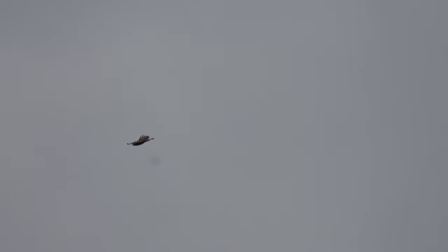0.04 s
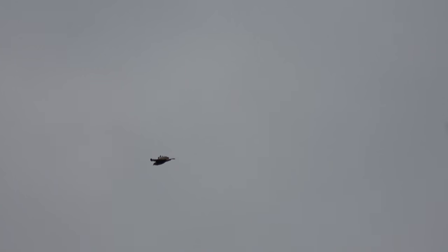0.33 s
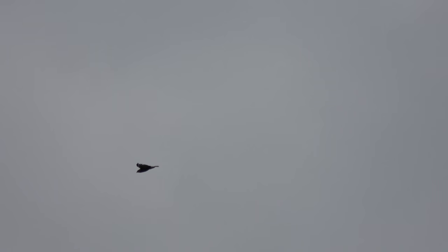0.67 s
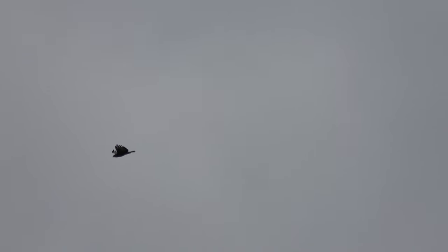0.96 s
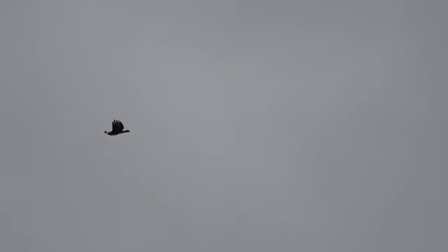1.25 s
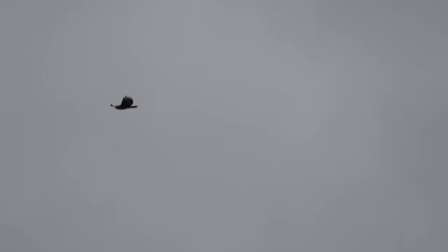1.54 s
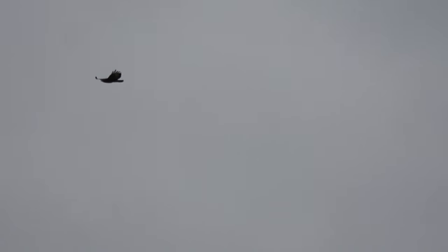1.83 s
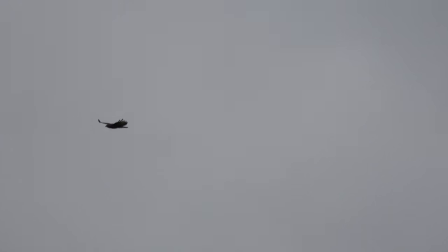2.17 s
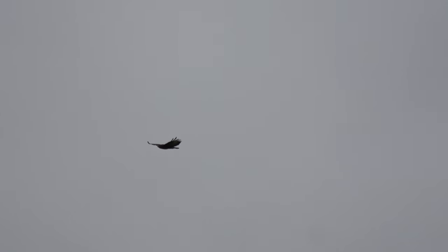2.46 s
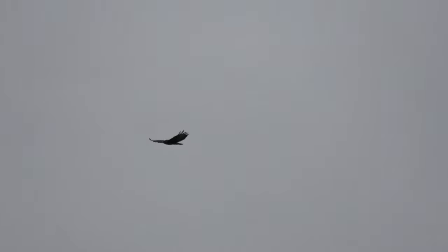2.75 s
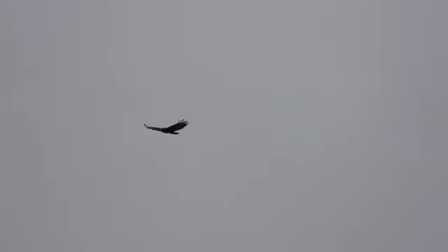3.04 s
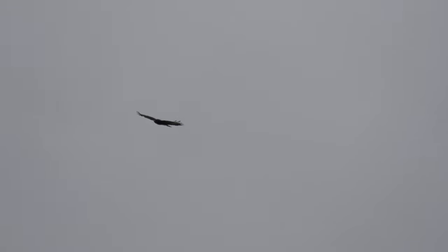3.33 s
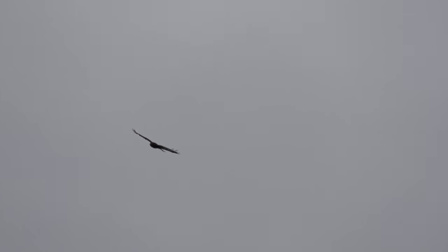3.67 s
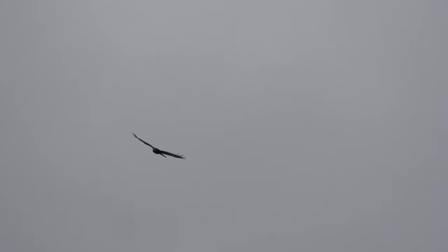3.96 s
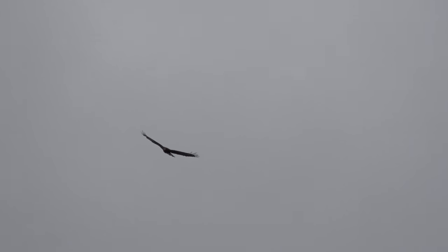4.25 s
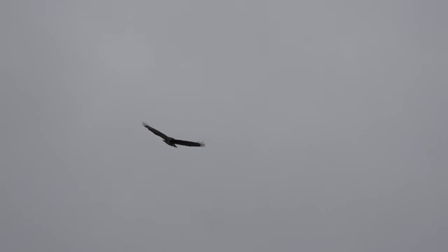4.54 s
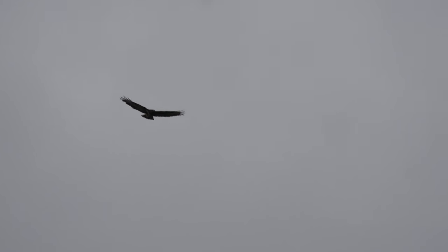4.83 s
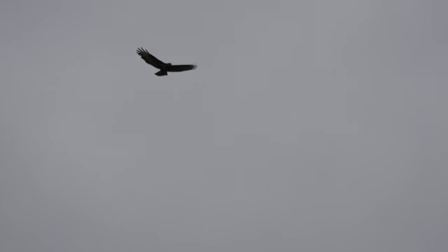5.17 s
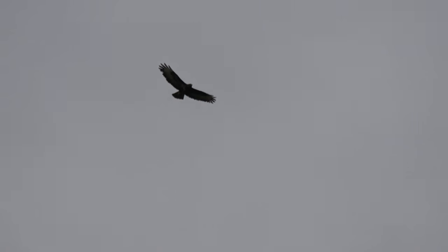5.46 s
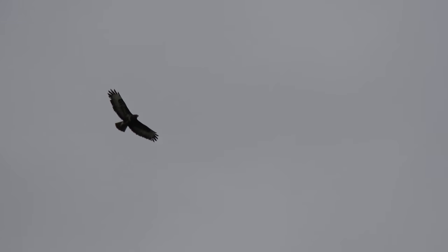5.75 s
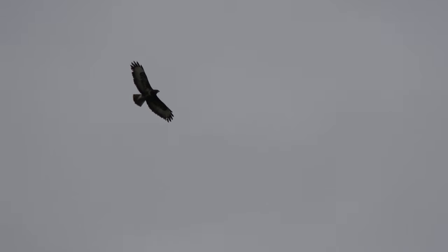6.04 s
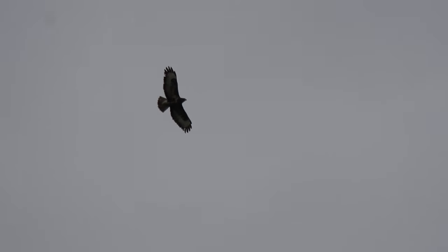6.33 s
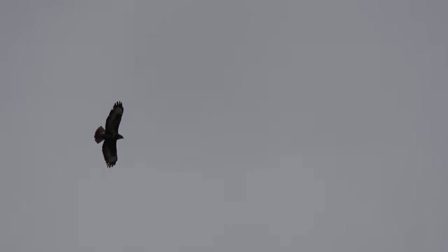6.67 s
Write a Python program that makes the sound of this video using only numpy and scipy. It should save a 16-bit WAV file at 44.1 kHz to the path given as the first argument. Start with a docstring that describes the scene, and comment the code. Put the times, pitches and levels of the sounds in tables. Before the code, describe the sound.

Wind rumbles softly on the microphone outdoors while faint, short bird calls echo through the trees and a hand-held camera ticks and bumps.

```python
"""Among trees on a breezy day, small birds call: runs of quick chips, hooked whistles, falling
slurs and, near the end, a trill. Far songs ring in the wood. Each call is a nearly pure tone that
glides in pitch and echoes off the trees. Under the birds, shaped noise makes the murmur of distant
air and the wind rumbling on the microphone. The hand-held camera gives a few soft bumps, tiny
clicks and creaks."""
import sys
import numpy as np
from scipy import signal
from scipy.fft import rfft, irfft, next_fast_len
from scipy.io import wavfile
from scipy.ndimage import uniform_filter1d, map_coordinates

SR = 44100
rng = np.random.default_rng(int(sys.argv[2]) if len(sys.argv) > 2 else 0)


def materialize(psi):
    """Save the field psi as 16-bit PCM at rate SR to the path in sys.argv[1].

    A 1-D psi becomes a single channel; in a 2-D psi each row is a channel.
    """
    bounded = np.clip(np.atleast_2d(psi).T, -1, 1)
    quanta = np.round(bounded * 32767).astype(np.int16)
    wavfile.write(sys.argv[1], SR, quanta)


N = 295470  # 6.7 seconds

# How the distant air rises and falls. Each row: time in seconds, murmur in dB, treetop rush in dB.
# Only the swings around each column's average are used.
AIR_SWINGS = [(0.0, -46.5, -50.5), (1.56, -45.5, -49), (2.05, -44, -50), (2.34, -45.5, -47.5),
              (3.44, -45, -49.5), (3.78, -46, -49.5), (4.76, -47, -49.5), (5.25, -46.5, -47),
              (5.84, -46.5, -48.5), (6.25, -48, -48), (6.68, -45, -45)]
# The tone of the far murmur. Each row: frequency in Hz, relative level in dB.
MURMUR_SPECTRUM = [(60, 4), (130, 3.5), (200, 2.5), (280, -0.5), (350, 2.5), (450, -2.5), (720, 0),
                   (1000, -4), (1350, -14), (2200, -16.5), (3200, -22.5), (5000, -27.5), (8000, -36)]
# The tone of the breeze in the treetops. Each row: frequency in Hz, relative level in dB.
RUSH_SPECTRUM = [(600, -12.5), (950, -4), (1200, 0), (1600, -9), (2100, -16.5), (3200, -41.5), (6000, -36)]
# The wind between gusts. Each row: time in seconds, level in dB.
BREEZE_LEVELS = [(0, -28), (.6, -27.5), (1.9, -26.5), (3.0, -28), (4.1, -26), (5.95, -26.5), (6.2, -31.5),
                 (6.7, -27)]
# Gusts on the microphone. Each row: time of the peak in seconds, length in seconds,
# relative rumble level in dB, relative buffeting level in dB.
WIND_GUSTS = [(0.205, 0.022, -17.5, -27.5), (0.908, 0.23, -25.5, -50), (2.42, 0.16, -16.5, -28),
              (2.526, 0.13, -13, -20.5), (3.429, 0.14, -14.5, -24), (3.97, 0.1, -23, -32),
              (4.341, 0.059, -22, -21.5), (4.466, 0.082, -17.5, -33), (4.728, 0.1, -17.5, -29),
              (5.1, 0.19, -21, -31), (5.368, 0.21, -22, -25.5), (5.7, 0.12, -20.5, -24.5),
              (5.87, 0.076, -15.5, -18), (6.363, 0.16, -33, -32.5), (6.69, 0.054, -22, -28.5)]
# The deep rumble of slow swirls of air. Each row: frequency in Hz, relative level in dB.
RUMBLE_SPECTRUM = [(10, 3.5), (22, 7.5), (35, 4.5), (50, 4), (66, -14.5), (110, -45), (200, -92)]
# The buffeting of faster swirls. Each row: frequency in Hz, relative level in dB.
BUFFET_SPECTRUM = [(40, -33), (68, 1), (90, -3.5), (120, -17.5), (170, -27.5), (300, -48.5), (700, -81)]
# The echo of the wood. Each row: frequency in Hz, seconds it takes to fade by 60 dB.
WOOD_ECHO_TIMES = [(1000, 0.99), (2000, 2.85), (4300, 1.07), (7000, 1.96)]
# How loud the most distant birds are. Each row: time in seconds, relative level in dB.
CHORUS_LEVELS = [(0, -53), (.8, -57.5), (1.5, -54.5), (2.1, -66), (3.1, -58), (4.4, -63.5), (5.6, -54),
                 (6.7, -62.5)]
# Runs of quick rising chips. Each row: start in seconds, number of chips (rounded when played),
# seconds from chip to chip, top pitch in Hz, relative level in dB.
CHATTER_RUNS = [(0.084, 3.7, 0.023, 5960, -41.5), (0.206, 3.7, 0.021, 5550, -45.5),
                (0.94, 2.6, 0.042, 5830, -48), (1.993, 4, 0.031, 5680, -50.5),
                (3.44, 5.4, 0.027, 4820, -51), (3.664, 4.8, 0.024, 5390, -42.5),
                (3.949, 1.75, .021, 5380, -44.5), (5.197, 1.8, 0.057, 5450, -44.5),
                (5.537, 2.9, .022, 5430, -42.5), (5.614, 1.87, 0.026, 6245, -42)]
# Whistles that hook upward and hold. Each row: start in seconds, length in seconds,
# held pitch in Hz, level of the hook in dB, level of the held part in dB.
HOOKED_WHISTLES = [(0.315, 0.093, 4266, -41, -40.5), (0.624, 0.067, 4340, -43, -52),
                   (1.658, 0.098, 4327, -43, -45.5), (2.106, 0.093, 4274, -42, -43.5),
                   (5.045, 0.105, 4385, -45.5, -50), (6.1, 0.094, 4423, -41.5, -51.5)]
# Small dry clicks of the camera. Each row: start in seconds, pitch in Hz, level in dB.
CAMERA_CLICKS = [(.469, 2200, -28), (1.588, 1240, -36), (2.952, 1900, -36), (3.34, 2480, -33)]
# Falling slurs. Each row: start in seconds, length in seconds, starting pitch in Hz,
# bend (1 falls straight, more holds before it drops), level without the echo in dB.
FALLING_SLURS = [(0.756, 0.048, 5200, 1.67, -56), (0.985, 0.08, 6400, 5, -56),
                 (1.084, 0.052, 5210, 2.3, -52), (1.212, 0.034, 3750, 1.1, -42.5),
                 (1.405, 0.032, 3820, 0.86, -41.5), (1.722, 0.039, 5800, 0.87, -52),
                 (1.896, 0.042, 3450, 1, -45)]
# Bumps on the camera body. Each row: time in seconds, relative strength in dB.
CAMERA_BUMPS = [(1.03, -24.5), (2.294, -23.5), (3.334, -18.5), (3.531, -27.5), (4.15, -27), (4.63, -28),
                (4.73, -24.5), (5.684, -29), (6.63, -26.5)]
# The pitches at which the camera's case rings. Each row: frequency in Hz, width in Hz, gain in dB.
CASE_RESONANCES = [(71, 21.6, 8), (157, 120, -12.5), (345, 22, -38)]
# Songs deep in the trees. Each row: start in seconds, length in seconds, starting pitch in Hz,
# ending pitch in Hz, relative level in dB.
FAR_SONG_NOTES = [(1.25, 0.2, 7750, 7680, -66), (1.305, 0.1, 1940, 1725, -43),
                  (1.43, 0.1, 2223, 2090, -42.5), (1.47, 0.09, 1510, 1450, -45),
                  (1.756, 0.079, 1920, 1840, -39), (1.949, 0.45, 1793, 1895, -41.5),
                  (2.062, 0.054, 4230, 4110, -48), (2.446, 0.096, 1606, 1466, -41.5),
                  (2.544, 0.36, 4290, 4180, -60.5), (3.615, 0.28, 2022, 1881, -47),
                  (3.739, 0.1, 4000, 3600, -49.5), (3.869, 0.072, 3030, 2905, -44.5),
                  (4.225, 0.083, 2254, 2220, -47), (4.798, 0.11, 2070, 2026, -48),
                  (4.828, 0.076, 1910, 1854, -47), (4.906, 0.11, 4600, 4320, -55),
                  (5.289, 0.12, 2165, 2340, -55.5), (5.527, 0.079, 1655, 1778, -46.5),
                  (5.74, 0.1, 2306, 2250, -52), (5.974, 0.08, 3430, 3220, -51),
                  (6.002, 0.055, 2690, 3010, -44.5), (6.179, 0.12, 2928, 2750, -44.5),
                  (6.634, 0.065, 2800, 3320, -46)]
# The grip creaking on the case. Each row: start in seconds, length in seconds, pitch in Hz, level in dB.
GRIP_CREAKS = [(2.299, 0.051, 308, -36.5), (3.34, 0.056, 357, -40.5), (4.285, 0.099, 336.6, -44),
               (5.679, 0.0405, 313, -39.5), (6.617, 0.081, 340, -43.5)]


def amp(db):
    """Turn decibels into a number to multiply a sound by."""
    return 10 ** (np.asarray(db) / 20)


def unit(x):
    """Scale a sound so that its average strength (rms) is 1."""
    return x / np.sqrt(np.mean(x ** 2) + 1e-20)


def along(points, hz):
    """Read between (frequency, value) rows on a logarithmic frequency scale."""
    freqs, values = np.transpose(points)
    return np.interp(np.log(hz + 1), np.log(freqs + 1), values)


def curves(rows):
    """Turn each column after the time into a curve with one value per sample."""
    times, *columns = np.transpose(rows)
    return [np.interp(np.arange(N) / SR, times, column) for column in columns]


def wobble(rate, size):
    """A smooth curve through `rate` random values a second."""
    return map_coordinates(rng.standard_normal(int(size * rate / SR) + 4), [np.arange(size) * rate / SR])


def filtered(x, response):
    """Filter a sound; `response` gives the gain and phase at each frequency."""
    size = next_fast_len(N + SR // 2)
    return irfft(rfft(x, size) * response(np.fft.rfftfreq(size, 1 / SR)), size)[..., :N]


def noise(spectrum):
    """Noise of strength 1 with the given tone."""
    return unit(filtered(rng.standard_normal(N), lambda hz: amp(along(spectrum, hz))))


def add(track, start, sound):
    """Mix a sound into the track at `start` seconds."""
    part = track[max(round(start * SR), 0):][:len(sound)]
    part += sound[:len(part)]


def progress(length):
    """A ramp from 0 to 1 over a note's length in seconds."""
    return np.linspace(0, 1, int(max(length, .005) * SR))


def note(hz, edge, waver, flutter_db=2):
    """A slightly unsteady tone that follows a pitch curve; `edge` is the share spent fading in and out."""
    pitch = hz * (1 + waver * wobble(245.7, len(hz)))
    strength = signal.windows.tukey(len(hz), edge) * amp(flutter_db * wobble(101.5, len(hz)))
    return strength * np.sin(2 * np.pi * np.cumsum(pitch) / SR)


def among_trees(call, branches_db, wood_db, direct=1):
    """A call arrives directly, then scattered by nearby branches, then as the wood's long echo."""
    hz, t, bands = signal.stft(rng.standard_normal(SR), SR, nperseg=256)
    fade = amp(-60 * t / along(WOOD_ECHO_TIMES, hz)[:, None])
    build_up = 1 - np.exp(-t / 0.0048)
    wood = signal.istft(bands * fade * build_up, SR, nperseg=256)[1][:SR]
    branches = rng.standard_normal(SR) * amp(-60 * np.arange(SR) / SR / 0.17)
    paths = (amp(branches_db) * unit(branches) + amp(wood_db) * unit(wood)) / np.sqrt(SR)
    paths[0] += direct
    return signal.fftconvolve(call, paths)


def distant_air(murmur_db=-42, rush_db=-49, rush_stretch=1.83):
    """The far murmur of the landscape and the breeze in the treetops: two noises that sway together."""
    murmur_swing, rush_swing = [level - level.mean() for level in curves(AIR_SWINGS)]
    sway_db = .5 * wobble(5, N)
    murmur = amp(murmur_db + murmur_swing + sway_db) * noise(MURMUR_SPECTRUM)
    rush = amp(rush_db + rush_stretch * rush_swing + sway_db) * noise(RUSH_SPECTRUM)
    return murmur + rush


def swirls(spectrum, evenness):
    """The pressure of swirling air: noise whose strength is steadier as `evenness` nears 1."""
    pressure = noise(spectrum)
    power = np.abs(uniform_filter1d(pressure ** 2, SR // 10)) + 1e-6
    return unit(pressure / power ** (evenness / 2))


def wind(buffet_db=-1.5, flurry_db=1.16):
    """Gusts ride on the breeze at the microphone: slow swirls rumble and faster ones buffet."""
    t = np.arange(N) / SR
    swell = lambda peak, length, db: amp(db) * np.exp(-2 * ((t - peak) / length) ** 2)
    slow = amp(curves(BREEZE_LEVELS)[0])
    fast = slow * amp(-11.5)  # calm air buffets less than it rumbles
    for peak, length, slow_db, fast_db in WIND_GUSTS:
        slow = np.hypot(slow, swell(peak, length, slow_db))
        fast = np.hypot(fast, swell(peak, 0.95 * length, fast_db))
    flurries = flurry_db * wobble(16, N)
    rumble = amp(flurries) * slow * swirls(RUMBLE_SPECTRUM, evenness=0.98)
    buffet = amp(buffet_db + 2 * flurries) * fast * swirls(BUFFET_SPECTRUM, evenness=0.93)
    return rumble + buffet


def chorus(gain_db=-2, centre_hz=2850, count=240):
    """Many birds far off: short random glides that blur together among the trees."""
    out = np.zeros(N)
    for i, (shift, height, slope, stretch, db) in enumerate(rng.standard_normal((count, 5))):
        start = (i + shift / 2) / count * N / SR
        length = .05 * np.exp(.3 * stretch)
        pitch = centre_hz * np.exp(.14 * height + .2 * slope * (progress(length) - .5))
        add(out, start, amp(db) * note(pitch, edge=0.66, waver=0.014))
    blurred = unit(among_trees(out, branches_db=4.5, wood_db=3)[:N])
    return amp(curves(CHORUS_LEVELS)[0] + gain_db) * blurred


def chip(top_hz, length=.0125, start_share=.56):
    """A bird's chip: one fast, scratchy rising sweep."""
    pitch = top_hz * (start_share + (1 - start_share) * progress(length))
    rasp = 1 + .4 * wobble(1200, len(pitch))
    return among_trees(rasp * note(pitch, edge=.5, waver=.05), branches_db=-3, wood_db=-3)


def chatter(run_gain_db=-1, arch_db=10.5, lead_hz=5880, lead_db=-50):
    """Evenly spaced chips in runs that swell and fade, and one chip leading into each whistle."""
    out = np.zeros(N)
    for start, count, gap, top_hz, db in CHATTER_RUNS:
        for k in range(round(count)):
            from_middle = (2 * k + 1) / count - 1
            strength = amp(db + run_gain_db - arch_db * from_middle ** 2)
            hz = top_hz * (1 + 0.026 * rng.standard_normal())
            add(out, start + k * gap, strength * chip(hz))
    for start, *_ in HOOKED_WHISTLES:
        add(out, start - .004, amp(lead_db) * chip(lead_hz))
    return out


def whistles(hook_s=0.024, ease_s=0.00705, start_share=.62, sag=0.02):
    """Each whistle sweeps up to its pitch, holds it and sags at the end; a tree line sends it back."""
    out = np.zeros(N)
    for start, length, held_hz, hook_db, held_db in HOOKED_WHISTLES:
        done = progress(length)
        t = done * length
        still_to_rise = np.clip(1 - t / (hook_s + ease_s), 0, 1) ** 1.5
        pitch = held_hz * (1 - (1 - start_share) * still_to_rise) * (1 - sag * done ** 6)
        strength = amp(np.interp(t, [hook_s, hook_s + 0.0017], [hook_db, held_db]))
        tone = note(pitch, edge=0.25, waver=0.012)
        add(out, start, among_trees(strength * tone, branches_db=-11, wood_db=-11))
        # the bird faces this way or that, but the trees always get the whole call
        add(out, start, among_trees(amp(-46) * tone, branches_db=-14, wood_db=0, direct=0))
    return out


def clicks(ring_s=0.0076):
    """Handling the camera makes tiny clicks that ring and die at once."""
    out = np.zeros(N)
    t = np.arange(SR // 20) / SR
    onset = 1 - np.exp(-t / 0.00017)
    for start, hz, db in CAMERA_CLICKS:
        add(out, start, amp(db - 60 * t / ring_s) * onset * np.sin(2 * np.pi * hz * t))
    return out


def slurs(fall_share=.37):
    """Each slur loses the same share of its pitch. All echo equally, so faint ones are more echo."""
    out = np.zeros(N)
    for start, length, start_hz, bend, db in FALLING_SLURS:
        pitch = start_hz * (1 - fall_share * progress(length) ** bend)
        tone = note(pitch, edge=.4, waver=.016)
        add(out, start, among_trees(tone, branches_db=-55.5, wood_db=-60, direct=amp(db)))
    return out


def bumps(gain_db=50, soft_hz=330, delay_s=0.0065):
    """Soft bumps thud through the camera's case, which rings at a few low pitches."""
    def case(hz):
        ringing = sum(amp(db) * 1j * hz * width / (centre ** 2 - hz ** 2 + 1j * hz * width)
                      for centre, width, db in CASE_RESONANCES)
        return ringing / (1 + 1j * hz / soft_hz) ** 2  # a soft blow has little treble

    blows = np.zeros(N)
    for start, db in CAMERA_BUMPS:
        # each soft thud sounds a moment after its listed time
        add(blows, start + delay_s, amp([db + gain_db]))
    return filtered(blows, case)


def far_songs(gain_db=-2):
    """Distant birds' fluting notes swell in and are drawn out by the wood."""
    out = np.zeros(N)
    for start, length, start_hz, end_hz, db in FAR_SONG_NOTES:
        pitch = start_hz + (end_hz - start_hz) * progress(length)
        tone = note(pitch, edge=.45, waver=.011, flutter_db=1.5)
        add(out, start, among_trees(amp(db + gain_db) * tone, branches_db=-11, wood_db=-4))
    return out


def creaks(roughness=0.029):
    """Fingers shift on the case and rub out a short, low, rough tone."""
    out = np.zeros(N)
    for start, length, hz, db in GRIP_CREAKS:
        pitch = np.full(len(progress(length)), hz)
        add(out, start, amp(db) * note(pitch, edge=0.49, waver=roughness))
    return out


def trill(start=6.39, count=4, first_gap_s=.109, sung_share=.58, top_hz=6150, end_hz=4530, db=-48):
    """A song of falling glides that come ever faster and settle on one pitch, blurred by the trees."""
    out = np.zeros(N)
    for k in range(count):
        gap = first_gap_s * .83 ** k
        drop_hz = (top_hz - end_hz) * .64 ** k
        pitch = end_hz + drop_hz * (1 - progress(sung_share * gap))
        tone = note(pitch, edge=.6, waver=.012)
        add(out, start, among_trees(amp(db) * tone, branches_db=-4, wood_db=-1))
        start += gap
    return out


def scene():
    """Air, wind, birds and the handling of the camera meet at one microphone."""
    background = distant_air() + wind() + chorus()
    birds = chatter() + whistles() + slurs() + far_songs() + trill()
    handling = clicks() + bumps() + creaks()
    return (background + birds + handling)[None]


def record(dry, hiss_db=-59, top_hz=15800):
    """The camera adds its own hiss and keeps nothing above `top_hz`."""
    hiss = amp(hiss_db) * noise([(100, -12.5), (6000, -2.5), (15000, -5.5)])
    return filtered(dry + hiss, lambda hz: hz < top_hz)


dry = scene()
out = record(dry)
materialize(out)
```